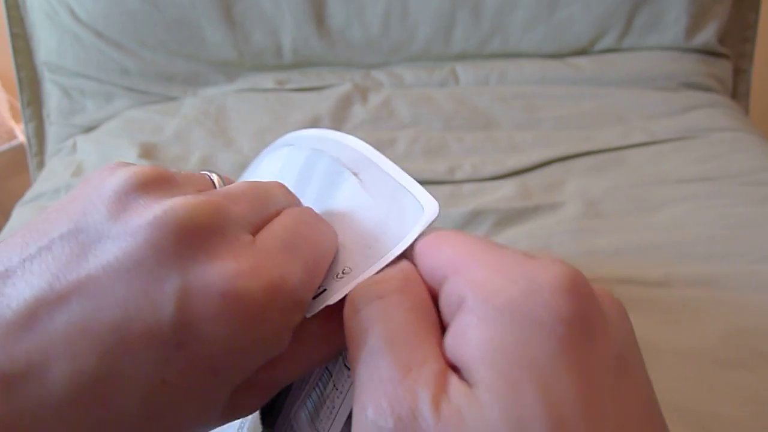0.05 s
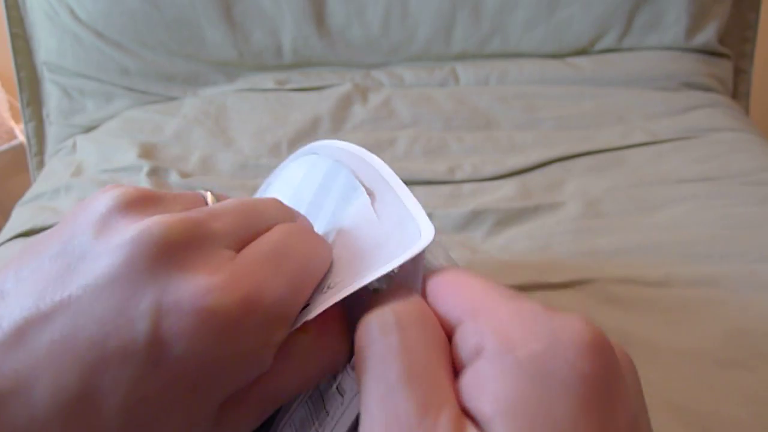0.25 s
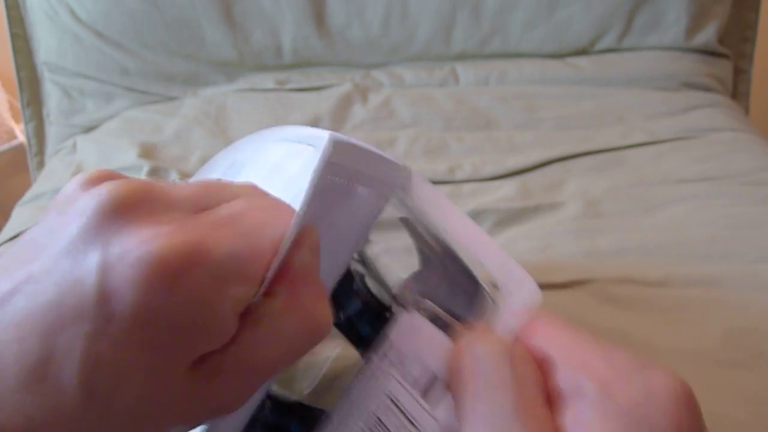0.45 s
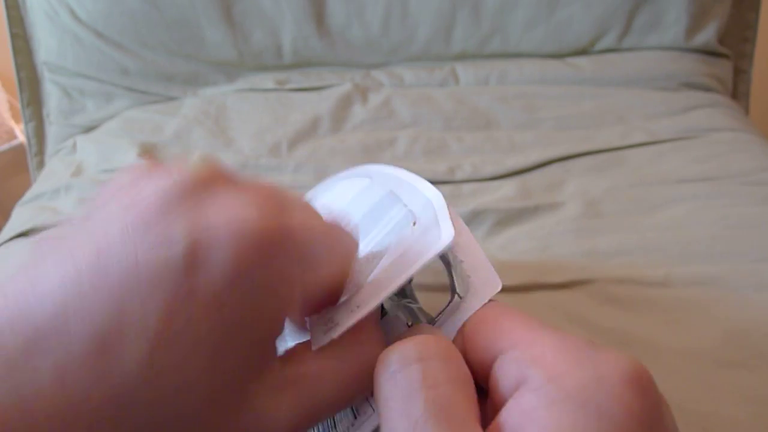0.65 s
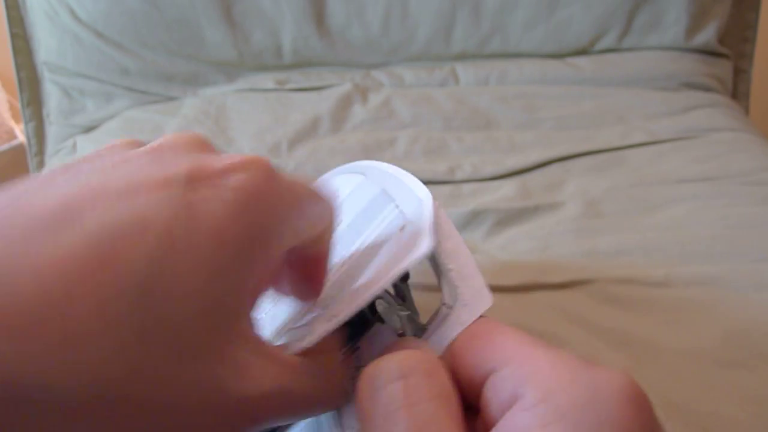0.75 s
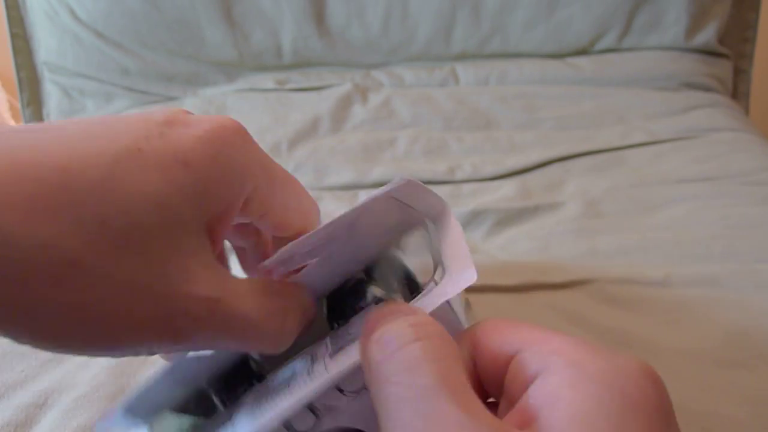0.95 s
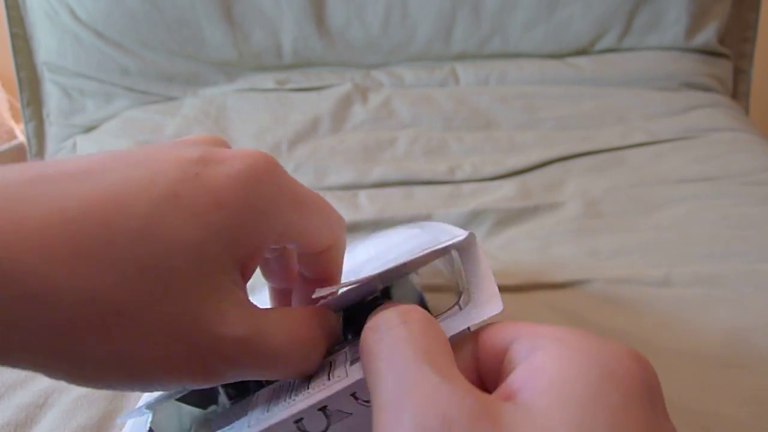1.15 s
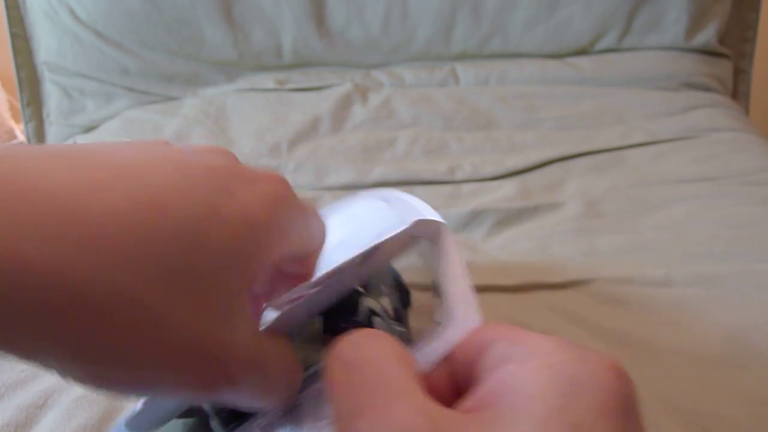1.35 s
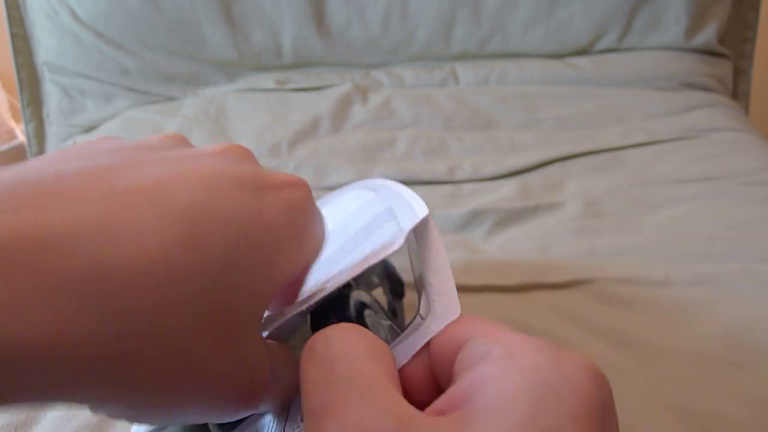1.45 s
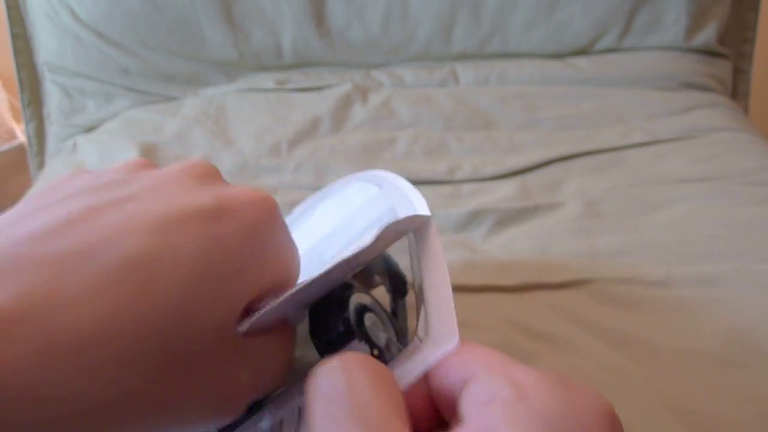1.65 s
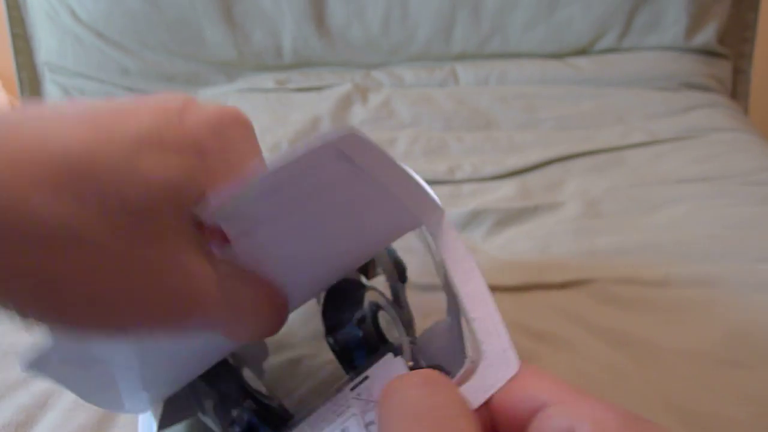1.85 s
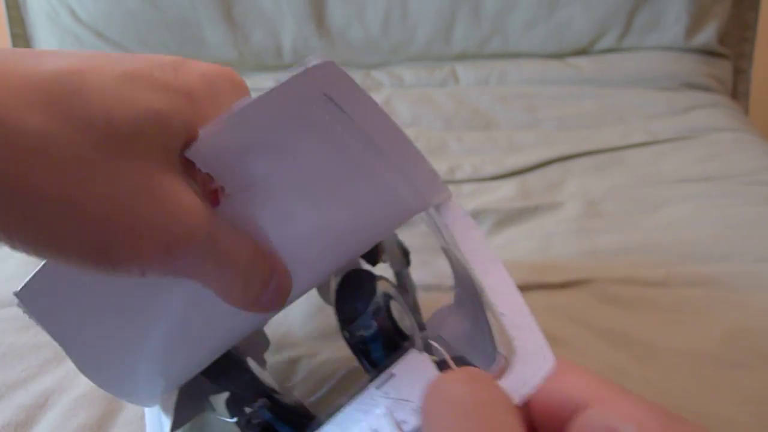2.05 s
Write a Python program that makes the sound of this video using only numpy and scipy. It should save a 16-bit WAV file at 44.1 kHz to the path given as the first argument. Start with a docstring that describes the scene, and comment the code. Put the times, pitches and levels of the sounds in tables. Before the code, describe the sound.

Card rips away from a plastic blister pack in two pulls, each with sharp, hollow snaps. Light crackles, rubbing and soft finger bumps fill the gap between them, heard close up in a small, quiet room.

```python
"""Opening a blister pack

Hands pull the card backing off a plastic blister pack, close up in a small room.
The card scrapes, rips from its glue in two pulls and slides over the rim; the plastic buckles in snaps.
The hollow tray rings after each one, fingers bump it, and a low hum lies underneath."""
import sys
import numpy as np
from scipy import signal
from scipy.fft import rfft, irfft
from scipy.io import wavfile

SR = 44100
rng = np.random.default_rng(int(sys.argv[2]) if len(sys.argv) > 2 else 0)


def materialize(psi):
    """Save the field psi as 16-bit PCM at rate SR to the path in sys.argv[1].

    A 1-D psi becomes a single channel; in a 2-D psi each row is a channel.
    """
    bounded = np.clip(np.atleast_2d(psi).T, -1, 1)
    quanta = np.round(bounded * 32767).astype(np.int16)
    wavfile.write(sys.argv[1], SR, quanta)


N = 92610


def amp(db):
    """Decibels to gain."""
    return 10 ** (np.asarray(db) / 20)


def unit_rms(x):
    """Scale to rms 1."""
    return x / np.sqrt(np.mean(x ** 2) + 1e-20)


def curve_at(points, hz):
    """Interpolate (freq_hz, value) points on a log-frequency axis."""
    freq_hz, value = np.transpose(points)
    return np.interp(np.log(hz + 1), np.log(freq_hz + 1), value)


def add(mix, start_s, sound):
    """Mix a sound in at start_s."""
    part = mix[max(round(start_s * SR), 0):][:len(sound)]
    part += sound[:len(part)]


def colour(x, points, size=4096):
    """Minimum-phase filter through (freq_hz, gain_db) points."""
    log_gain = np.log(amp(curve_at(points, abs(np.fft.fftfreq(size, 1 / SR)))))
    taps = np.fft.ifft(np.exp(np.conj(signal.hilbert(log_gain)))).real
    return signal.fftconvolve(x, taps[:size // 2])[:len(x)]


def split_bands(x, treble_eq, mid_from_hz, bass_to_hz):
    """Split into coloured treble, mid and bass."""
    edges_hz = [(2085, 9400), (mid_from_hz, 2085), (100, bass_to_hz)]
    filters = [signal.butter(3, band, "band", fs=SR, output="sos") for band in edges_hz]
    treble, mid, bass = [signal.sosfilt(sos, x) for sos in filters]
    return colour(treble, treble_eq), mid, bass


def wander(max_hz):
    """Random drift below max_hz, rms 1."""
    passband = np.fft.rfftfreq(N, 1 / SR) < max_hz
    return unit_rms(irfft(rfft(rng.standard_normal(N)) * passband, N))


def room_tone(hush_db=-52, hum_db=-60, hum_hz=116.2, waver_hz=3):
    """Steady hush with a wavering low hum."""
    # hush spectrum: freq_hz, relative_db
    spectrum = [(20, -21), (38, -10), (55, -13.5), (90, -5.5), (120, -4.5), (160, -18.5), (205, -7.5),
                (300, -10.5), (480, -15.5), (850, -15), (2000, -19.5), (3200, -18.5), (6500, -30.5),
                (8000, -40)]
    gain = amp(curve_at(spectrum, np.fft.rfftfreq(N, 1 / SR)))
    hush = irfft(rfft(rng.standard_normal(N)) * gain, N)
    pitch_hz = hum_hz + waver_hz * wander(max_hz=4.6)
    hum = np.sin(2 * np.pi * np.cumsum(pitch_hz) / SR)
    return amp(hush_db) * unit_rms(hush) + amp(hum_db) * unit_rms(hum)


def room_reverb(x, gain_db=-10.5, gap_s=0.002):
    """Diffuse tail of a small room; the bass dies first."""
    # room decay: freq_hz, t60_s
    decay_times = [(200, 0.27), (1000, 0.55), (3500, .4), (7000, 0.53)]
    hz, t, noise = signal.stft(rng.standard_normal(SR // 2), SR, nperseg=256)
    decay = np.exp(-np.log(1000) * t / curve_at(decay_times, hz)[:, None])
    tail = signal.istft(noise * decay, SR, nperseg=256)[1]
    tail *= np.arange(len(tail)) / SR > gap_s
    return amp(gain_db) * signal.fftconvolve(x, tail / np.linalg.norm(tail))[:N]


def tray_ring(drive, gain_db=-46.5):
    """The hollow pack rings on after whatever shakes it."""
    # tray and card modes: freq_hz, relative_db, t60_s
    modes = [(436, -8, .2), (502, -5, .2), (554, -9, .2), (654, -8, .15), (749, 0, .15), (812, -4, .13),
             (936, -2, .13), (1217, -8, .16), (1347, -2, .15), (1415, -6, .14), (1573, -6, .16),
             (1788, -4, .14), (2579, -3, .12), (3107, 0, .08), (3184, -1, .08), (3250, -1, .08),
             (3454, 0, .14), (4710, -2, .09), (6250, 1, .13)]
    t = np.arange(12000) / SR
    ring = sum(amp(db) * np.exp(-np.log(1000) * t / t60_s) * np.cos(2 * np.pi * hz * t)
               for hz, db, t60_s in modes)
    return amp(gain_db) * signal.fftconvolve(drive, ring)[:N]


def finger_bumps():
    """A soft push swings the pack for a few cycles."""
    # finger bumps and flaps of the freed card: start_s, pitch_hz, peak_db, rise_s
    bumps = [(.1985, 356, -25.5, 0.0027), (.4405, 460, -15.5, 0.0031), (0.4591, 472, -16.5, 0.0034),
             (.4705, 595, -18, 0.0048), (0.493, 132, -31.5, 0.015), (.54, 220, -39, 0.0044),
             (0.5839, 358, -30.5, 0.0042), (0.6448, 238, -26.5, 0.004), (.688, 490, -28.5, 0.0036),
             (0.846, 128, -46, 0.007), (.919, 264, -37, .0035), (1.12, 346, -35, 0.0041),
             (1.524, 254, -44, 0.013), (1.692, 79, -49, 0.011)]
    out, t = np.zeros(N), np.arange(4400) / SR
    for start_s, pitch_hz, peak_db, rise_s in bumps:
        envelope = (t / rise_s) ** 2 * np.exp(1 - (t / rise_s) ** 2)
        add(out, start_s, amp(peak_db) * envelope * np.sin(2 * np.pi * pitch_hz * t))
    return out


def card_scrape(grains_per_s=3200, spread_db=3, grip_db=2, rise_s=0.011, release_s=0.0069):
    """Card fibres catch and slip in dense grains, clumped by an uneven grip."""
    # scrapes, tears and slides: start_s, length_s, treble_db, mid_db, bass_db
    strokes = [(-.01, 0.026, -40, -40.5, -51), (0.049, 0.075, -53.5, -51.5, -68),
               (0.09, 0.017, -47, -45.5, -55.5), (0.107, 0.043, -37.5, -45.5, -56),
               (0.195, 0.03, -33, -37.5, -47), (0.24, 0.039, -49, -69, -60),
               (0.286, 0.023, -38.5, -48.5, -58.5), (0.31, 0.064, -45, -50.5, -64),
               (0.367, 0.037, -36.5, -43, -61), (.402, 0.023, -26, -29.5, -63),
               (0.425, 0.051, -28.5, -25, -33), (0.48, 0.022, -35, -56, -44.5),
               (.87, 0.09, -56, -52, -54.5), (0.985, 0.083, -60, -57, -57), (1.208, 0.18, -68, -62, -60),
               (1.435, 0.081, -62, -58, -56), (1.502, 0.042, -50, -53.5, -49.5),
               (1.547, 0.053, -52.5, -60.5, -55.5), (1.611, 0.032, -46.5, -49, -54),
               (1.735, 0.024, -60, -39, -56), (1.759, .07, -34, -38, -48), (1.83, 0.028, -43, -44.5, -46),
               (1.857, 0.024, -38, -37, -58.5), (1.881, 0.02, -46, -57, -44.5),
               (1.904, 0.02, -51, -35.5, -48), (1.934, 0.022, -44, -43, -44), (1.981, 0.049, -42, -46, -48),
               (2.034, 0.062, -44.5, -47, -57)]
    # scrape colour: freq_hz, gain_db
    treble_eq = [(2000, -5.5), (2600, -1), (3200, 0), (3700, -2), (4700, 0), (5500, -3), (6500, -6),
                 (7500, -13)]
    grains = (rng.random(N) < grains_per_s / SR) * rng.choice([-1., 1.], N)
    grains *= amp(spread_db * np.minimum(rng.exponential(1, N), 4))
    hiss = 0.63 * rng.standard_normal(N)
    grip = amp(grip_db * wander(max_hz=172.8))
    friction = (unit_rms(grains) + hiss) * grip
    bands = [unit_rms(b) for b in split_bands(friction, treble_eq, mid_from_hz=550, bass_to_hz=550)]
    out, t = np.zeros(N), np.arange(N) / SR
    for start_s, length_s, *levels_db in strokes:
        attack = np.clip((t - start_s) / rise_s, 0, 1)
        release = np.exp(-np.maximum(t - start_s - length_s, 0) / release_s)
        out += attack * release * sum(amp(db) * band for db, band in zip(levels_db, bands))
    return out


def plastic_snaps(rise_s=0.00051, hold_s=0.00063, tail_db=-17.5, tail_s=0.011, crack_share=0.38):
    """Each buckle is a sharp crack, a burst of a few milliseconds, then a short fainter tail."""
    # plastic buckling, glue letting go: start_s, treble_db, mid_db, bass_db, decay_s
    snaps = [(0.0102, -40.5, -36, -44.5, 0.0034), (.139, -29, -33, -69, 0.0015),
             (.156, -29.5, -35, -65, 0.0014), (0.161, -37, -46, -53, 0.0022), (.168, -34, -37, -42, 0.0023),
             (0.183, -27, -33, -61, 0.0023), (0.199, -28.5, -27, -32.5, 0.0035),
             (.2125, -33, -42, -40.5, 0.0031), (.264, -41, -51, -56, 0.0014),
             (.285, -35, -38.5, -47, 0.0044), (0.295, -36.5, -47, -50, 0.0017),
             (.4135, -20, -27, -36, 0.006), (0.416, -25, -12, -29.5, 0.0017),
             (0.441, -41, -28.5, -25.5, .004), (0.4462, -13, -17, -42.5, 0.0025),
             (0.4597, -36, -25, -26, 0.0041), (.473, -55.5, -28, -26.5, 0.0031),
             (0.4886, -16, -16.5, -27, 0.0045), (0.495, -23, -24.5, -31.5, 0.0023),
             (0.542, -46, -41, -35, 0.0029), (0.68, -43, -39, -45.5, 0.0052),
             (.685, -30.5, -36.5, -44.5, 0.0036), (0.739, -42.5, -43.5, -60, 0.0051),
             (.7535, -30, -33.5, -53, 0.0034), (.763, -37.5, -37, -42.5, 0.0068),
             (.791, -59, -37, -44.5, 0.0026), (.836, -41.5, -38, -40, 0.0048),
             (.843, -47, -35.5, -43, 0.0034), (.915, -38, -41, -42, 0.0037), (1.01, -43, -39, -50, 0.0037),
             (1.083, -46, -50, -55, 0.0025), (1.117, -45, -44, -46.5, 0.0074),
             (1.1365, -39.5, -42.5, -40.5, 0.0038), (1.2535, -49, -40.5, -48, 0.0036),
             (1.424, -37.5, -39.5, -46, 0.0055), (1.4334, -49, -34.5, -43, 0.0085),
             (1.443, -32, -36, -41.5, 0.0016), (1.479, -45, -46, -58, 0.0052),
             (1.5, -40.5, -38.5, -55.5, 0.004), (1.6294, -32, -34, -45.5, 0.0019),
             (1.691, -50.5, -48.5, -56, 0.0039), (1.6944, -40, -34.5, -54, .002),
             (1.6975, -8, -12.5, -25, 0.002), (1.7125, -20.5, -19.5, -28.5, 0.0054),
             (1.7244, -12, -15.5, -36, 0.0022), (1.779, -23.5, -25, -38, 0.0037),
             (1.8148, -31, -31, -35.5, 0.009), (1.923, -17, -19.5, -33, 0.0013),
             (1.929, -29, -22, -32.5, 0.0032), (1.957, -24.5, -29.5, -56, 0.00072),
             (2.0055, -34, -35.5, -54, 0.0041), (2.0441, -32.5, -38, -42, 0.0018),
             (2.081, -37.5, -51, -39, 0.002)]
    # snap colour: freq_hz, gain_db
    treble_eq = [(2000, 5), (2600, 2), (3200, 1), (3800, 0.5), (4600, -3.5), (5400, -6.5), (6400, -11),
                 (7500, -17.5)]
    out, t = np.zeros(N), np.arange(2600) / SR
    crack = np.sqrt(crack_share) * (t == 0)
    attack = np.minimum(t / rise_s, 1)
    fade = amp(tail_db) * np.exp(-t / tail_s)
    for start_s, *levels_db, decay_s in snaps:
        decay = np.exp(-np.maximum(t - hold_s, 0) / decay_s)
        envelope = attack * (decay + fade)
        strength = np.linalg.norm(envelope)
        burst = np.sqrt(1 - crack_share) * envelope / strength * rng.choice([-1., 1.], len(t))
        bands = split_bands(crack + burst, treble_eq, mid_from_hz=672, bass_to_hz=447)
        snap = sum(amp(db) * band / np.linalg.norm(band) for db, band in zip(levels_db, bands))
        add(out, start_s, strength * snap)
    return out


def scene(scrape_to_tray_db=-2.5):
    """Snaps and scrapes ring the tray and, with the bumps, echo in the room."""
    snaps, scrape = plastic_snaps(), card_scrape()
    direct = snaps + scrape + finger_bumps()
    ring = tray_ring(snaps + amp(scrape_to_tray_db) * scrape)
    return (direct + ring + room_reverb(direct) + room_tone())[None]


def record(dry, cutoff_hz=8950):
    """Microphone with a dull top treble, then a steep low-pass."""
    # microphone response: freq_hz, gain_db
    mic_eq = [(20, -3.5), (6800, -1.5), (7300, -3.5), (7700, -13), (8000, -22), (8500, -21.5), (9000, -30)]
    low_pass = signal.firwin(401, cutoff_hz, window=("kaiser", 9), fs=SR)
    return signal.oaconvolve(colour(dry[0], mic_eq), low_pass, "same")[None]


dry = scene()
out = record(dry)
materialize(out)
```